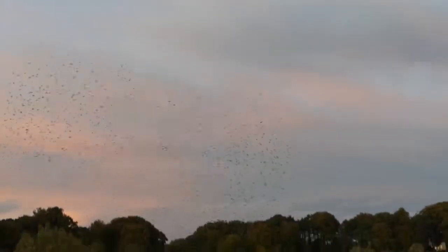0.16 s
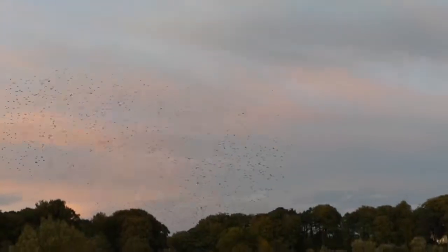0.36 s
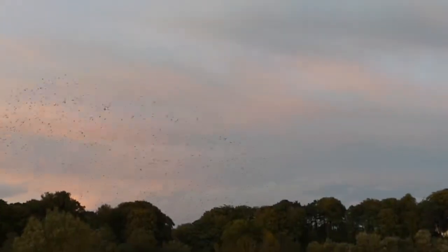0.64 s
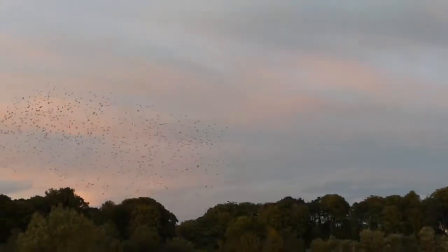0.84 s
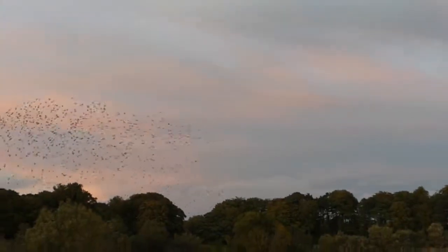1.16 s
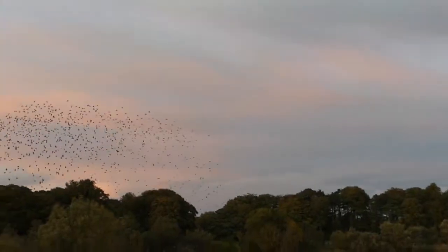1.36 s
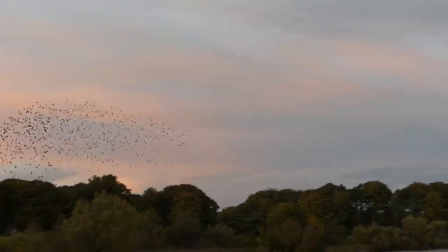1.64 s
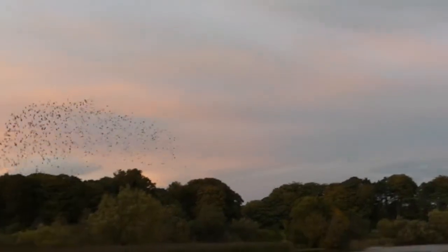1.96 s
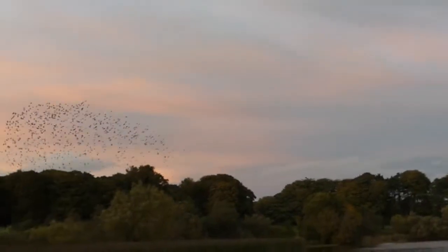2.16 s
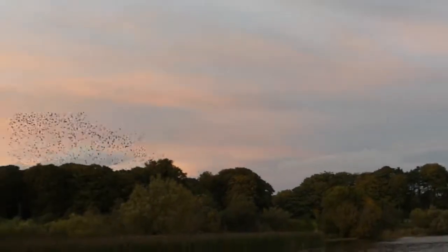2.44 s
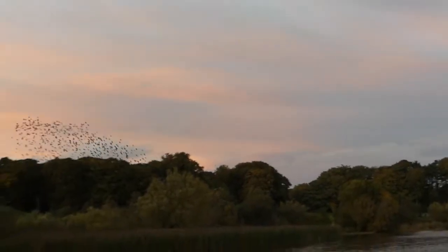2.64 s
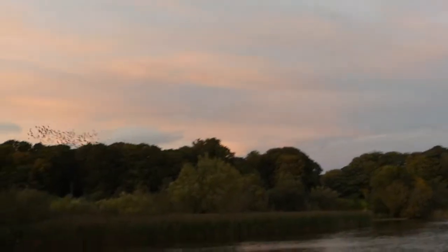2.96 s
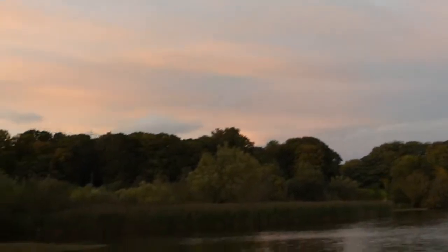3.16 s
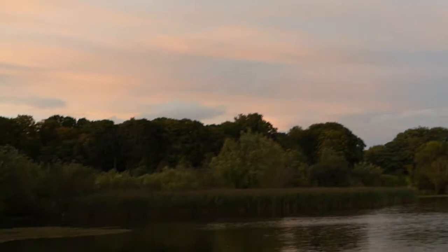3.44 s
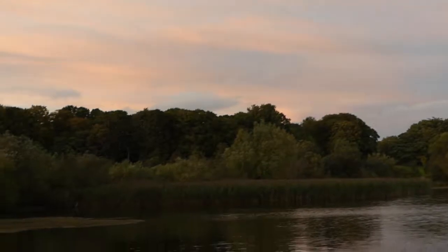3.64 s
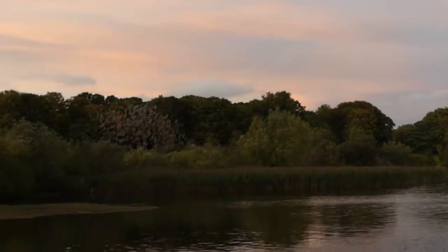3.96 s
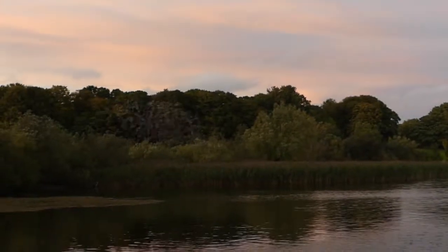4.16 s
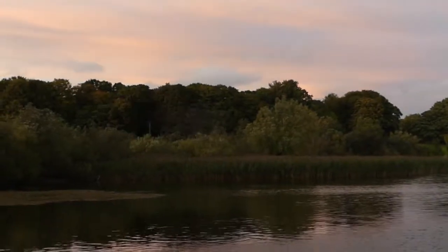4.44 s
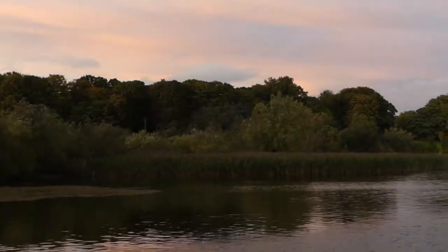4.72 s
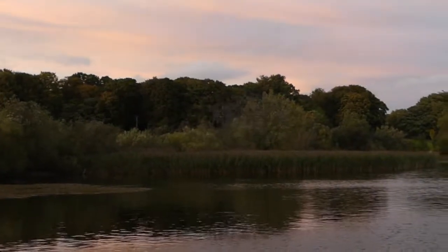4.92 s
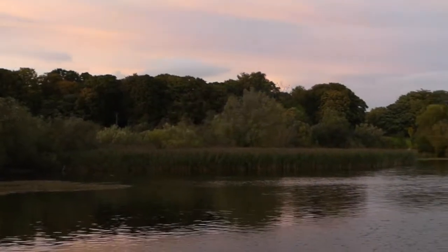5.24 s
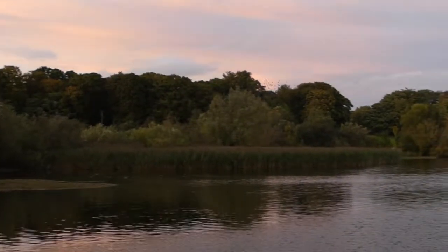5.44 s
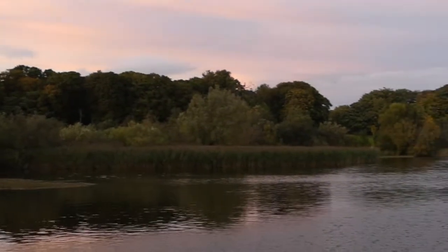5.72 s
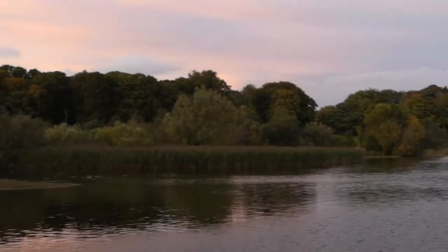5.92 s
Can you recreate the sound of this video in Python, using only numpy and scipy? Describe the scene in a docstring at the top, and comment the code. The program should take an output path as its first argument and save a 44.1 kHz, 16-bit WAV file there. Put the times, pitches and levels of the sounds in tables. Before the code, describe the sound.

A very large flock of starlings chatters densely from a reed bed across a pond at dusk, with sharp whistles and rasps standing out.

```python
"""A reed bed across a pond at dusk, where a very large flock of starlings chatters.
Single whistles, sweeps and rasps, made as frequency-modulated tones, stand out of thousands of
farther calls over filtered noise; the nearest birds sing short phrases along drawn pitch lines.
Trees smear every note by scattering; a low rumble lies beneath, and one distant microphone
adds its own hiss. The bass is cut from the birds."""
import sys
import numpy as np
from scipy import signal
from scipy.fft import rfft, irfft
from scipy.io import wavfile
from scipy.ndimage import uniform_filter1d

SR = 44100
rng = np.random.default_rng(int(sys.argv[2]) if len(sys.argv) > 2 else 0)


def master(y):
    """Save y as 16-bit WAV."""
    cut = np.clip(np.atleast_2d(y).T, -1, 1)
    pcm = np.round(cut * 32767)  # scale
    wavfile.write(sys.argv[1], SR, pcm.astype(np.int16))


N = 268436  # samples


def gain_of(db):
    """Amplitude ratio: 20 dB is a factor of ten in pressure."""
    return 10 ** (np.asarray(db) / 20)


def evened(x):
    """Normalises mean power: scales to rms 1."""
    return x / np.sqrt(np.mean(abs(x) ** 2) + 1e-20)


def coloured(x, points):
    """Linear filtering: weights the spectrum by a (Hz, dB) curve, 120 dB down outside it, to rms 1."""
    hz, db = np.transpose(points)
    log_hz = np.log(np.fft.rfftfreq(N, 1 / SR) + 1)
    curve_db = np.interp(log_hz, np.log(hz), db, -120, -120)
    return evened(irfft(rfft(x) * gain_of(curve_db), N))


def add(mix, start_s, sound):
    """Superposition: lays a sound into the mix from its start."""
    part = mix[round(start_s * SR):][:len(sound)]
    part += sound[:len(part)]


def air(level_db=-75, gust_db=2.8, gusts_per_s=7):
    """Band-split noise with random amplitude modulation: each band of the far rumble swells alone."""
    # spectrum of the far evening rumble: pitch_hz, relative_level_db
    air_colour = [(18, -55), (30, -30), (64, -22.5), (217, -28), (573, -9.5), (673, -15.5), (802, -24.5),
                  (1000, 1.5), (1300, -25.5), (2200, -120)]
    hz = np.fft.rfftfreq(N, 1 / SR)
    spectrum = rfft(coloured(rng.standard_normal(N), air_colour))
    edges_hz = [0, 110, 250, 450, 700, SR]
    gusts = rng.standard_normal((50, 5)).T
    gust_steps = np.arange(N) / SR * gusts_per_s
    rumble = np.zeros(N)
    for gust, low_hz, high_hz in zip(gusts, edges_hz, edges_hz[1:]):
        band = irfft(spectrum * ((hz >= low_hz) & (hz < high_hz)), N)
        swell_db = gust_db * np.interp(gust_steps, np.arange(50), gust)
        rumble += gain_of(level_db + swell_db) * band
    return rumble


def note(length_s, first_hz, middle_hz, last_hz, hoarse_hz,
         shake=0.419, throb_db=4.5, rise=0.78, fullness=0.56):
    """Frequency and amplitude modulation: an unsteady syrinx shakes a bent whistle into a rasp."""
    size = max(round(length_s * SR), 64)
    u = np.arange(size) / size
    # parabola through the first, middle and last pitch
    hz = first_hz * (1 - u) * (1 - 2 * u) + 4 * middle_hz * u * (1 - u) + last_hz * u * (2 * u - 1)

    steps = np.arange(int(length_s * 2000) + 4)
    pitch_walk, level_walk = rng.standard_normal((len(steps), 2)).T
    # new random values per second: higher and hoarser notes flutter faster
    flutter_hz = np.clip(.04 * middle_hz + 1.5 * hoarse_hz, 20, 2000)
    at = u * length_s * flutter_hz
    # even a clear note wavers, in proportion to its pitch
    deviation_hz = shake * (hoarse_hz + .012 * middle_hz)
    hz = hz + deviation_hz * np.interp(at, steps, np.clip(pitch_walk, -1.5, 1.5))

    throb_depth_db = throb_db * np.tanh(0.17 + hoarse_hz / 100)
    throb = gain_of(throb_depth_db * np.interp(at, steps, level_walk))
    tone = throb * np.sin(2 * np.pi * np.cumsum(hz) / SR)
    flatness = fullness * min(np.sqrt(0.029 / length_s), 1)  # long notes hold their level
    return evened(tone * np.sin(np.pi * u ** rise) ** flatness)


def patchy(x, patch_db):
    """Time-frequency modulation: groups of birds swell and fade in patches.

    Each is some hundred Hz wide and about a tenth of a second long."""
    spectrogram = signal.stft(x, nperseg=512)[2]
    patches = rng.standard_normal(spectrogram.shape[::-1]).T
    for _ in range(2):
        patches = uniform_filter1d(patches, size=5, axis=0)  # along frequency
        patches = uniform_filter1d(patches, size=14, axis=1)  # along time
    uneven = spectrogram * gain_of(patch_db * evened(patches))
    return evened(signal.istft(uneven, nperseg=512)[1][:N])


def register(k, spread_db=2.5, bend=.09, blur_db=2.0):
    """Random superposition: chance calls in one pitch range over a noise blur of unresolved birds."""
    # one row for each kind of call (low chirps, rattles, high whistles): lowest_hz, highest_hz
    pitch_ranges = [(1100, 3400), (3400, 5400), (5400, 8800)]
    # calls begun in each range: calls_per_s
    call_rates = [260, 130, 150]
    # shortest call in each range, the longest being four times this: length_s
    shortest_s = [.015, .015, .035]
    # upper limit of the hoarseness given to a note in each range: hoarseness_hz
    hoarsest_hz = [349, 711, 496]
    # how unevenly the unresolved birds call in each range: rms_swell_db
    patch_depths_db = [1.2, 2.2, 2.5]
    low_hz, high_hz = pitch_ranges[k]
    calls = np.zeros(N)
    chances = rng.random((round(call_rates[k] * N / SR), 6))
    for when, pitch, length, size, glide, rasp in chances:
        hz = low_hz + (high_hz - low_hz) * pitch
        step = 1 + bend * np.tan(2.6 * (glide - .5)) / 3  # most calls are level, a few sweep far
        length_s = shortest_s[k] * 4.0 ** length
        hoarse_hz = hoarsest_hz[k] * rasp ** 1.483  # most calls are fairly clear
        call = note(length_s, hz / step, hz, hz * step ** 0.53, hoarse_hz)
        add(calls, when * N / SR, gain_of(-spread_db * np.log(size + 0.15)) * call)

    band = [(low_hz - 300, -30), (low_hz, 0), (high_hz, 0), (high_hz + 300, -30)]
    if k == 0:
        band[0] = (500, -1)  # the lowest blur reaches further down
    if k == 2:
        band[-1] = (9900, -1)  # the highest reaches further up
    blur = patchy(coloured(rng.standard_normal(N), band), patch_depths_db[k])
    return evened(calls) + gain_of(blur_db) * blur


def roost():
    """Incoherent summation: three kinds of call add up, each swelling at its own pace."""
    # how hard the roost calls, before the mix:
    # time_s, low_chatter_level_db, rattle_level_db, high_whistle_level_db
    roost_levels = [(0.0, -42, -47, -47.5), (0.4, -43, -48, -49.5), (0.83, -42, -49, -48.5),
                    (1.5, -41.5, -47.5, -47), (2.25, -41, -45.5, -47), (2.5, -41, -44.5, -46.5),
                    (2.83, -40.5, -47.5, -47), (3.12, -39.5, -45.5, -43), (3.39, -39.5, -43.5, -44),
                    (3.59, -41.5, -42, -41), (3.78, -41, -47, -42), (4.14, -39.5, -40, -43),
                    (4.54, -39, -45.5, -39.5), (4.97, -40.5, -41.5, -43), (5.37, -39.5, -42.5, -39),
                    (5.76, -41, -41.5, -42), (6.09, -42, -45, -42)]
    # spectrum of the massed calls: pitch_hz, relative_level_db
    chorus_colour = [(350, -62), (600, -32), (804, -27), (1130, -14.5), (1720, -1.5), (2810, -0.5),
                     (3460, -4.5), (5860, -6.5), (6740, -9), (7850, -8), (8520, -16.5), (9800, -31),
                     (12700, -61), (21600, -120)]
    time_s, *levels_db = np.transpose(roost_levels)
    t = np.arange(N) / SR
    flock = np.zeros(N)
    for k, level_db in enumerate(levels_db):
        swell = gain_of(np.interp(t, time_s, level_db))
        flock += swell * coloured(register(k), chorus_colour)
    return flock


def trees(x, t60_s=0.97, gap_s=0.0074):
    """Multiple scattering: reeds, water and trunks return sparse echoes of random sign that die away."""
    taps = np.zeros(SR // 2)
    # one tap at a random place in every 22 samples
    at = np.arange(0, len(taps) - 22, 22) + rng.integers(0, 22, (len(taps) - 1) // 22)
    taps[at] = rng.choice([-1., 1.], len(at))
    t = np.arange(len(taps)) / SR
    taps *= gain_of(-60 * t / t60_s) * (t > gap_s)
    return signal.oaconvolve(x, taps / np.linalg.norm(taps))[:N]


def phrase(curve, shake_hz, throb_db):
    """Phase integration: a shaky tone follows a pitch line; returns its start and sound."""
    time_s, hz, db = np.transpose(curve)
    t = np.arange(time_s[0], time_s[-1], 1 / SR)
    shake = evened(uniform_filter1d(rng.standard_normal(len(t)), size=60))
    throb = evened(uniform_filter1d(rng.standard_normal(len(t)), size=200))
    pitch_hz = np.interp(t, time_s, hz) + shake_hz * shake
    tone = np.sqrt(2) * np.sin(2 * np.pi * np.cumsum(pitch_hz) / SR)  # rms 1
    level = gain_of(np.interp(t, time_s, db) + throb_db * throb)
    return time_s[0], level * tone * signal.windows.tukey(len(t), .1)


def soloists(far_db=-42, nearness=0.34, phrase_sent_db=-4, scatter_db=-6.0):
    """Direct-to-reverberant ratio: loud birds are near, so they sound drier than the far ones."""
    # notes that stand out: start_s, length_s, first_pitch_hz, last_pitch_hz, level_db, hoarseness_hz
    notes = [(0.016, .017, 1980, 2040, -51, 30), (.057, 0.018, 2210, 2130, -48, 30),
             (0.046, .033, 2413, 2450, -49, 20), (0.082, 0.049, 4700, 4720, -55, 97),
             (0.073, 0.033, 2400, 2100, -47, 20), (0.135, 0.037, 2490, 2770, -49, 110),
             (0.153, 0.028, 1803, 1660, -50, 18), (0.263, 0.022, 1710, 1890, -53, 30),
             (0.285, 0.015, 1840, 1690, -53, 30), (0.356, 0.035, 1280, 1424, -52, 29),
             (.55, 0.019, 1925, 2030, -45.5, 30), (0.647, 0.018, 2100, 2000, -53, 30),
             (0.86, .027, 2630, 2260, -52, 30), (0.954, 0.026, 2605, 2500, -48, 28),
             (0.098, 0.04, 1620, 1790, -51, 36), (0.201, .029, 3980, 6200, -53, 1200),
             (0.216, 0.024, 2110, 1990, -49, 40), (0.294, 0.16, 8570, 8330, -50.5, 510),
             (0.368, 0.075, 6840, 6340, -50, 84), (.447, .035, 6270, 6650, -48.5, 150),
             (.6, .1, 7950, 7870, -54, 90), (.228, .03, 3970, 3970, -55, 60),
             (0.248, 0.05, 4560, 4510, -54, 340), (0.4, 0.06, 8180, 8000, -51, 90),
             (.465, .115, 8080, 8120, -49, 160), (0.421, 0.028, 3990, 5540, -50, 190),
             (0.479, 0.14, 6960, 7150, -48, 260), (0.455, 0.045, 3640, 3660, -49.5, 210),
             (0.507, 0.044, 3070, 2600, -48, 46), (0.527, 0.053, 1880, 1990, -58, 15),
             (0.573, 0.037, 2950, 2763, -40, 30), (.615, 0.03, 5760, 5980, -46.5, 90),
             (.75, .07, 7600, 7700, -57, 120), (0.728, 0.03, 4860, 4900, -48, 40),
             (0.746, 0.026, 2690, 2550, -45, 68), (0.78, 0.022, 2560, 2370, -50, 30),
             (0.796, 0.016, 2225, 2120, -47, 30), (0.855, 0.07, 8380, 8750, -53, 120),
             (.93, .1, 8700, 8300, -53, 100), (1.04, .1, 8500, 8600, -54, 200),
             (0.914, 0.074, 2660, 2450, -50, 63), (1.05, 0.06, 6080, 5920, -50, 290),
             (1.103, 0.024, 2910, 2810, -46.5, 26), (1.126, 0.022, 2550, 2550, -49, 30),
             (1.143, 0.022, 5050, 4750, -47, 600), (1.087, .016, 4900, 4900, -51, 80),
             (1.16, .024, 4350, 4280, -51, 80), (1.513, .016, 3800, 4050, -51, 60),
             (1.47, .035, 3700, 3650, -52, 120), (1.575, .02, 5400, 5250, -52, 80),
             (1.21, 0.035, 4250, 4180, -54, 110), (1.32, 0.022, 3950, 4100, -49, 80),
             (1.169, 0.035, 3000, 2940, -46.5, 30), (1.26, 0.1, 7800, 8050, -54, 150),
             (1.401, .097, 7900, 7850, -52, 310), (1.405, 0.075, 2120, 2090, -53, 55),
             (1.979, .033, 2710, 2660, -47, 40), (2.378, .022, 2400, 2430, -49, 30),
             (2.968, .016, 1840, 1780, -46.5, 30), (3.058, .045, 2550, 2340, -46, 76),
             (2.959, 0.052, 2950, 2850, -48, 120), (3.104, 0.029, 3190, 2850, -46, 150),
             (1.54, 0.07, 7520, 7550, -52, 180), (1.47, 0.016, 4830, 4800, -47, 61),
             (1.528, 0.033, 4400, 4340, -47.5, 60), (1.563, .022, 4300, 4600, -51, 60),
             (1.56, 0.02, 2370, 2300, -54, 33), (1.572, 0.017, 2200, 2090, -44, 30),
             (1.593, 0.03, 2770, 2720, -51, 30), (1.612, 0.041, 2760, 2050, -48, 20),
             (1.639, 0.022, 2700, 2820, -50, 36), (1.697, 0.043, 3300, 3150, -52, 37),
             (1.74, .025, 3020, 3050, -52, 44), (1.632, 0.051, 1644, 1620, -51, 45),
             (1.675, 0.065, 7830, 7800, -52, 150), (1.65, 0.12, 7140, 7600, -52.5, 490),
             (1.7, 0.12, 8400, 8500, -54, 150), (1.83, .08, 8050, 8150, -54, 150),
             (1.92, .07, 8450, 8450, -53, 120), (1.771, 0.03, 1780, 1725, -46, 20),
             (1.829, 0.023, 2850, 2600, -51, 30), (1.768, 0.03, 3440, 4570, -52, 1200),
             (1.835, 0.023, 3180, 3100, -53, 35), (1.887, 0.096, 2960, 3046, -49, 61),
             (1.886, 0.034, 2620, 2710, -51, 40), (2.02, 0.17, 6050, 6300, -51, 130),
             (2.041, 0.033, 1480, 1810, -49.5, 47), (2.15, 0.2, 6400, 6780, -49.5, 840),
             (2.2, 0.16, 7750, 7690, -49.5, 690), (2.218, 0.042, 8000, 7980, -42.5, 120),
             (2.352, 0.035, 2713, 1815, -50, 53), (2.37, 0.15, 8420, 8600, -51.5, 100),
             (2.55, .09, 8650, 8700, -56, 60), (2.393, .033, 7800, 7680, -47, 80),
             (2.62, .055, 7600, 7660, -50, 70), (2.485, .02, 7000, 6350, -49, 150),
             (2.705, .06, 6100, 6200, -49, 250), (2.955, .04, 7400, 7520, -49, 80),
             (2.418, 0.027, 4700, 4570, -47, 380), (2.521, 0.01, 1960, 2000, -42, 40),
             (2.314, 0.043, 2750, 2770, -51, 120), (2.481, 0.096, 4120, 3396, -46, 600),
             (2.52, 0.12, 4700, 4320, -51, 370), (2.63, 0.12, 5830, 5800, -50, 110),
             (2.74, 0.065, 4500, 5350, -46.5, 1900), (2.827, 0.032, 2310, 2360, -47, 41),
             (2.852, 0.025, 7800, 6800, -50, 300), (2.858, .03, 7560, 7620, -50, 60),
             (2.893, 0.17, 7150, 7250, -50.5, 260), (3.025, 0.04, 2910, 2830, -46, 50),
             (3.135, 0.022, 5870, 5660, -48, 100), (3.204, 0.013, 3720, 3750, -42, 100),
             (3.212, .022, 3700, 2700, -46, 150), (3.14, .04, 3000, 3150, -48, 250),
             (3.35, .022, 2540, 2390, -49, 40), (3.38, 0.028, 1894, 1880, -46.5, 40),
             (3.45, .04, 2774, 2790, -49, 60), (3.17, 0.05, 7600, 7750, -50, 250),
             (3.33, .05, 7350, 7300, -51, 200), (3.229, 0.04, 2610, 2610, -45, 300),
             (3.165, .08, 4620, 4580, -50, 40), (3.32, 0.03, 1760, 1730, -46, 60),
             (3.285, .03, 7480, 7450, -48, 90), (3.22, .03, 8350, 8350, -50, 90),
             (3.395, .03, 7300, 7280, -50.5, 80), (3.428, 0.028, 3610, 3540, -44.5, 110),
             (3.433, 0.018, 6900, 6980, -44, 50), (3.437, 0.05, 2400, 2470, -42.5, 40),
             (3.548, 0.018, 2200, 2500, -44, 100), (3.567, 0.018, 2700, 2900, -49, 75),
             (3.5, 0.03, 2523, 2250, -45, 150), (3.508, 0.025, 3100, 2600, -45, 200),
             (3.518, 0.02, 2050, 2100, -45, 60), (3.535, .025, 3150, 2950, -47, 80),
             (3.682, 0.2, 5930, 5850, -51, 410), (3.728, 0.11, 5120, 5040, -47, 490),
             (3.76, 0.11, 6980, 6280, -47.5, 540), (3.745, 0.032, 2566, 2510, -49.5, 30),
             (3.925, .025, 2500, 2380, -50, 40), (3.838, 0.018, 2890, 2830, -47, 44),
             (3.865, 0.07, 8620, 8600, -47, 70), (3.82, .035, 8550, 8620, -50, 100),
             (3.84, 0.07, 6150, 6120, -50, 92), (3.935, .045, 6050, 6100, -48, 150),
             (3.899, 0.013, 3900, 4100, -41, 290), (3.908, 0.011, 4100, 3400, -39.5, 230),
             (3.916, .038, 5800, 5770, -47, 560), (3.95, 0.021, 5280, 4880, -41, 500),
             (3.957, 0.091, 2020, 2023, -48, 33), (3.996, 0.085, 2750, 3240, -53, 270),
             (4.051, 0.024, 2875, 3220, -41, 270), (4.068, .02, 3110, 3050, -51, 60),
             (4.07, 0.041, 2130, 1930, -52, 60), (4.13, 0.078, 4210, 3870, -48, 480),
             (4.183, 0.02, 3300, 3250, -38, 120), (4.16, .025, 3350, 3200, -45, 300),
             (4.395, .02, 3700, 3800, -40, 300), (4.475, .02, 3500, 3500, -41, 600),
             (4.191, 0.033, 3110, 2340, -45, 40), (4.203, 0.02, 3400, 3800, -45, 200),
             (4.235, .015, 3200, 3200, -45, 150), (4.246, 0.063, 6100, 6000, -47, 250),
             (4.27, 0.028, 3900, 3050, -44, 250), (4.301, 0.19, 6150, 6020, -49, 57),
             (4.316, 0.13, 7320, 7150, -48.5, 490), (4.359, 0.075, 6680, 6600, -49, 102),
             (4.435, .08, 6480, 6680, -46, 120), (4.36, 0.025, 8550, 6500, -42, 520),
             (4.366, 0.029, 4240, 4280, -36, 480), (4.387, 0.011, 5120, 4720, -36, 200),
             (4.391, 0.016, 4320, 4030, -32.5, 60), (4.404, 0.014, 4040, 4160, -31.5, 30),
             (4.415, 0.0088, 4420, 4100, -36, 66), (4.422, .009, 3920, 3880, -32.5, 30),
             (4.432, 0.0076, 4120, 3470, -30.5, 66), (4.438, 0.022, 3520, 3810, -32, 40),
             (4.459, 0.011, 3830, 3680, -36, 40), (4.471, 0.0059, 3970, 3420, -34.5, 54),
             (4.491, 0.012, 3970, 4350, -40, 200), (4.503, 0.0096, 4550, 4840, -37.5, 140),
             (4.428, .014, 4450, 4500, -42, 140), (4.35, .03, 3760, 3700, -43, 190),
             (4.548, .03, 2900, 3000, -43, 100), (4.58, .1, 2950, 2990, -46, 112),
             (4.52, 0.016, 3450, 3530, -34.5, 40), (4.531, 0.0089, 3560, 3770, -30.5, 33),
             (4.541, 0.0057, 3830, 3370, -38, 80), (4.572, 0.07, 7050, 7000, -41, 170),
             (4.53, .04, 6800, 6830, -46, 200), (4.64, .035, 7100, 7200, -45, 100),
             (4.565, 0.09, 6150, 5950, -47, 200), (4.624, 0.18, 6080, 5780, -46, 490),
             (4.72, 0.075, 6950, 7050, -50, 120), (4.548, .06, 8600, 8550, -50, 120),
             (4.37, .09, 8150, 8200, -51, 130), (4.01, .025, 7900, 7850, -50, 100),
             (4.16, .03, 7200, 7250, -50, 200), (4.44, .09, 7550, 7500, -52, 150),
             (4.687, 0.04, 1738, 1830, -53, 44), (4.771, 0.031, 2420, 2370, -48, 73),
             (4.78, 0.068, 2920, 2760, -49, 190), (5.232, 0.062, 2950, 2990, -49.5, 87),
             (5.745, 0.058, 2710, 2880, -48, 45), (4.795, 0.11, 8200, 7800, -47.5, 420),
             (4.838, 0.1, 6350, 5950, -48, 110), (4.805, 0.075, 3900, 3900, -49, 120),
             (4.867, 0.048, 8400, 8500, -41.5, 200), (4.935, .048, 8330, 8340, -41, 200),
             (4.88, 0.22, 8510, 8670, -50.5, 390), (4.977, 0.025, 2930, 2920, -45, 39),
             (4.95, 0.035, 8520, 8620, -47, 220), (4.982, 0.016, 4200, 4480, -44, 200),
             (4.935, .018, 4900, 5200, -48, 200), (5.18, .08, 4480, 4430, -51, 90),
             (5.27, .045, 4200, 4220, -50, 90), (5.255, .03, 3600, 3750, -48, 200),
             (5.512, .018, 4300, 3900, -46, 300), (5.15, .025, 5450, 5520, -48, 90),
             (5.012, 0.067, 7600, 7780, -45, 120), (5.035, 0.03, 2650, 2350, -45, 150),
             (5.08, 0.098, 8490, 8540, -46, 70), (5.19, 0.074, 8450, 8420, -45, 105),
             (5.125, 0.03, 2900, 3100, -45, 250), (5.17, .03, 2850, 3000, -44, 200),
             (5.125, .02, 2250, 2100, -48, 50), (5.121, 0.087, 7960, 8120, -47, 410),
             (5.148, 0.065, 6420, 6400, -48, 80), (4.89, .04, 6700, 6750, -53, 20),
             (4.868, 0.046, 5980, 5950, -49, 90), (5.216, 0.076, 7060, 7100, -43.5, 120),
             (5.296, .075, 7150, 7100, -45, 93), (5.232, 0.055, 2120, 2190, -45, 86),
             (5.23, .035, 3280, 3420, -48, 80), (5.246, 0.21, 8870, 8660, -56, 280),
             (5.285, 0.13, 8560, 8500, -47.5, 75), (5.299, .1, 8330, 8360, -49, 76),
             (5.343, 0.056, 5980, 5880, -48, 36), (5.354, .096, 6930, 7440, -52, 180),
             (5.381, .028, 2410, 2450, -50, 34), (5.404, 0.13, 6750, 6870, -44.5, 520),
             (5.41, 0.065, 2720, 2760, -46, 150), (5.475, .045, 2800, 2810, -44, 60),
             (5.5, 0.14, 5960, 5860, -46, 220), (5.504, .044, 3200, 3360, -43, 530),
             (5.535, 0.04, 2796, 2780, -46, 90), (5.6, 0.16, 5790, 4800, -49, 54),
             (5.62, 0.064, 7150, 7500, -45, 420), (5.597, 0.065, 5980, 6080, -44, 260),
             (5.68, 0.03, 3030, 3000, -46, 80), (5.675, 0.045, 2690, 2360, -45.5, 87),
             (5.709, 0.096, 5930, 5890, -47.5, 126), (5.702, 0.09, 8380, 8360, -44, 66),
             (5.785, .085, 8400, 8200, -43.5, 100), (5.831, 0.045, 7280, 7220, -49, 90),
             (5.76, 0.051, 7830, 7880, -48, 120), (5.686, .025, 6200, 6250, -46, 140),
             (5.44, 0.07, 7920, 7950, -48, 90), (5.655, 0.048, 7670, 7800, -45, 93),
             (5.582, 0.045, 8120, 8170, -50, 140), (6.014, 0.057, 8400, 8430, -49.5, 60),
             (5.833, 0.019, 3230, 3450, -43, 40), (5.855, 0.035, 3160, 3150, -47, 220),
             (5.895, 0.017, 3250, 3430, -46, 50), (5.85, 0.14, 6280, 5970, -44.5, 340),
             (5.875, 0.047, 2920, 2930, -46.5, 40), (5.921, .06, 2870, 3020, -47, 58),
             (5.91, 0.11, 8200, 8200, -45, 200), (5.854, 0.041, 8150, 8000, -43, 190),
             (5.919, 0.066, 8030, 7730, -47, 290), (5.93, 0.014, 3350, 3050, -42, 60),
             (5.944, 0.095, 6330, 6420, -43.5, 360), (6.014, 0.065, 3050, 2965, -48.5, 46)]
    # phrases of the nearest birds, five tables with the same columns: time_s, pitch_hz, level_db
    # a rising sweep
    sweep = [(2.245, 1858, -54), (2.265, 2334, -53), (2.283, 2546, -47), (2.295, 2675, -38.5),
             (2.31, 3223, -45), (2.322, 4020, -42.5), (2.335, 4350, -43)]
    # a wavering whistle that ends low
    whistle = [(2.53, 1987, -47), (2.545, 2099, -36), (2.563, 2078, -35), (2.582, 2170, -40),
               (2.603, 2273, -39.5), (2.622, 2160, -39.5), (2.636, 2107, -44), (2.641, 2270, -42),
               (2.658, 2263, -42), (2.668, 2387, -45), (2.676, 2214, -57), (2.69, 2023, -48),
               (2.696, 1850, -44), (2.703, 1674, -48), (2.72, 1540, -47), (2.736, 1580, -48)]
    # a whistle that arches up and back
    arch = [(3.78, 2330, -51), (3.79, 2260, -45), (3.806, 2390, -41), (3.816, 2516, -51),
            (3.826, 2620, -46), (3.836, 2510, -45), (3.862, 2446, -43.5), (3.874, 2360, -49),
            (3.886, 2500, -46), (3.892, 2480, -55)]
    # a high pipe that climbs
    pipe = [(3.516, 5750, -52), (3.523, 5850, -46), (3.532, 6050, -51), (3.546, 6950, -54),
            (3.557, 7130, -45), (3.578, 6990, -44), (3.62, 7100, -44), (3.648, 7150, -43),
            (3.656, 7150, -51), (3.668, 7320, -48), (3.679, 7400, -58), (3.69, 7430, -51),
            (3.745, 7530, -52), (3.765, 7000, -51)]
    # a high warble, up and down by turns
    warble = [(3.25, 7300, -56), (3.264, 6900, -50), (3.278, 7300, -57), (3.294, 6700, -48),
              (3.308, 7200, -55), (3.322, 6680, -49), (3.336, 7300, -49), (3.352, 6650, -53),
              (3.372, 6750, -49), (3.39, 6400, -51)]
    direct, sent = np.zeros((2, N))  # sent: what reaches the trees
    for start_s, length_s, first_hz, last_hz, db, hoarse_hz in notes:
        call = note(length_s, first_hz, (first_hz + last_hz) / 2, last_hz, hoarse_hz)
        add(direct, start_s, gain_of(db) * call)
        add(sent, start_s, gain_of(db - nearness * max(db - far_db, 0)) * call)

    # each line with its shake in Hz rms and its throb in dB rms
    lines = [(sweep, 100, 2), (whistle, 25, 0.88), (arch, 25, 1.2), (pipe, 30, 1.2), (warble, 50, 1.5)]
    for curve, shake_hz, throb_db in lines:
        start_s, call = phrase(curve, shake_hz, throb_db)
        add(direct, start_s, call)
        add(sent, start_s, gain_of(phrase_sent_db) * call)
    return direct + gain_of(scatter_db) * trees(sent)


def scene():
    """Superposition of birds and air, the birds high-passed, alike in two channels."""
    far = roost()
    far_scattered = far + gain_of(-9.5) * trees(far)
    birds = soloists() + gain_of(-2.5) * far_scattered
    bass_cut = signal.butter(6, 600, "high", fs=SR, output="sos")
    birds = signal.sosfilt(bass_cut, birds)
    return np.tile(birds + air(), (2, 1))


def record(dry, hiss_db=-63.5, edge_hz=15750):
    """Additive noise and band limiting: one microphone feeds both channels with the same hiss."""
    # spectrum of the microphone hiss before the band limit: pitch_hz, relative_level_db
    hiss_colour = [(5470, -21), (9300, -8), (11000, -7), (13600, -4), (15100, 3.5), (15700, -4.5)]
    hiss = coloured(rng.standard_normal(N), [*hiss_colour, (17000, 0)])
    mono = dry + gain_of(hiss_db) * hiss
    band_limit = signal.firwin(1023, edge_hz, window=("kaiser", 9), fs=SR)
    return signal.oaconvolve(mono, band_limit[None], "same")


dry = scene()
out = record(dry)
master(out)
```